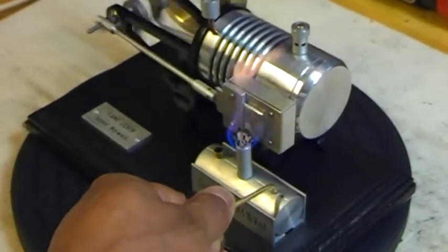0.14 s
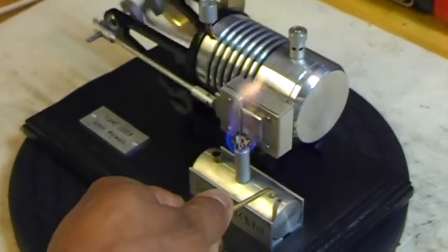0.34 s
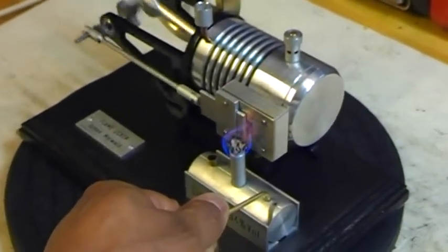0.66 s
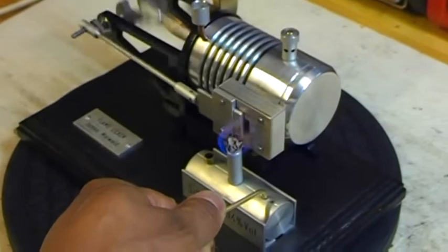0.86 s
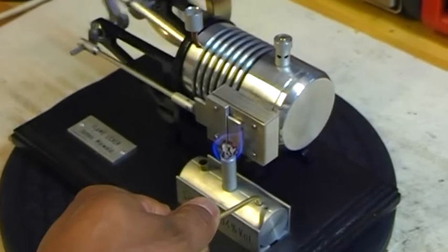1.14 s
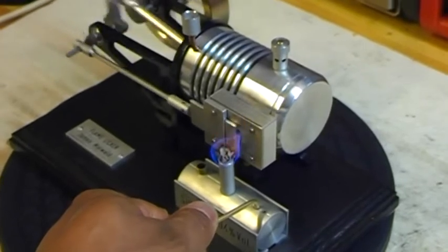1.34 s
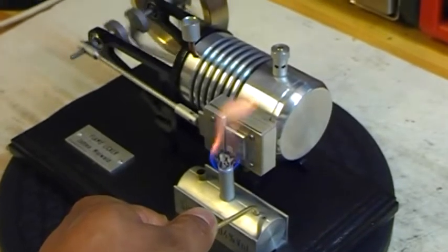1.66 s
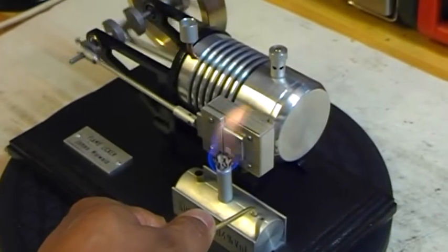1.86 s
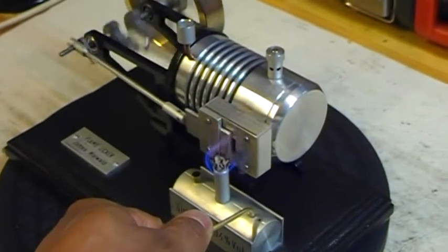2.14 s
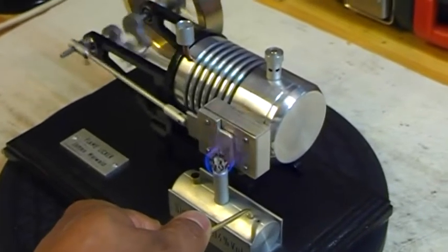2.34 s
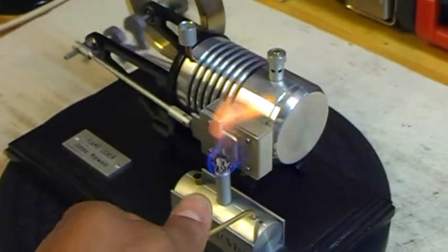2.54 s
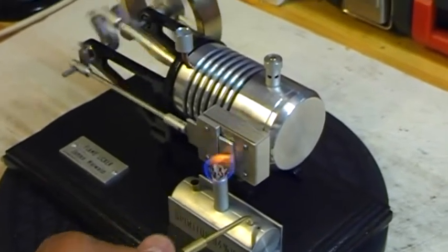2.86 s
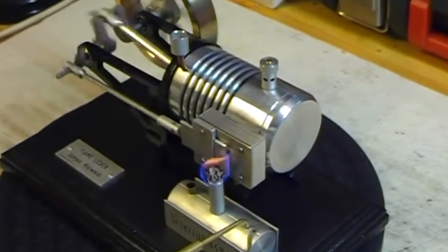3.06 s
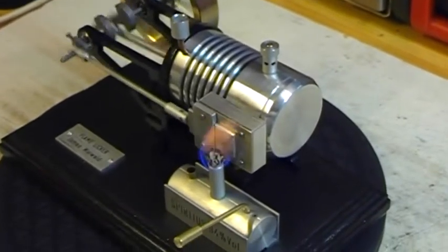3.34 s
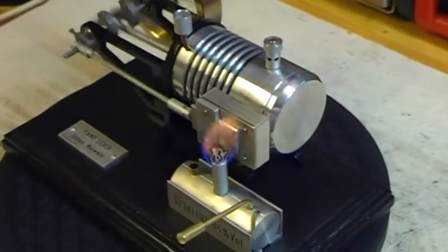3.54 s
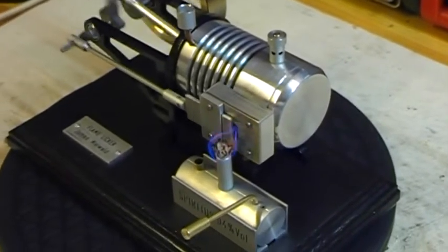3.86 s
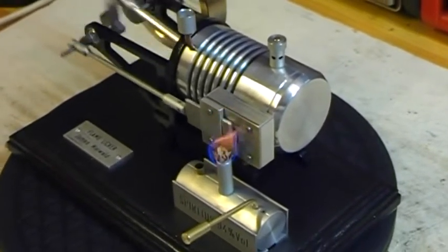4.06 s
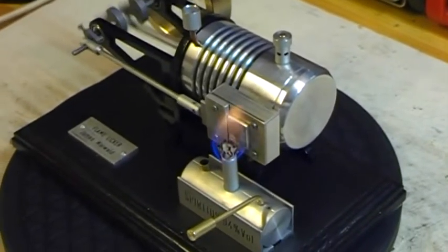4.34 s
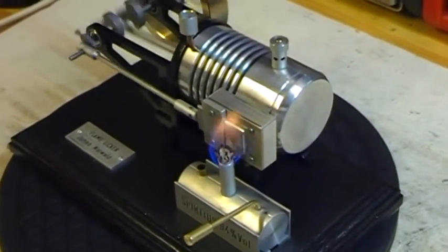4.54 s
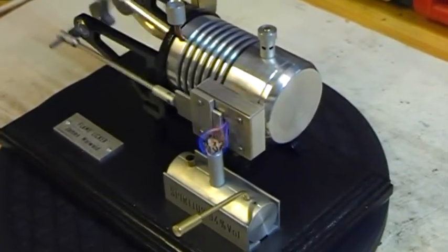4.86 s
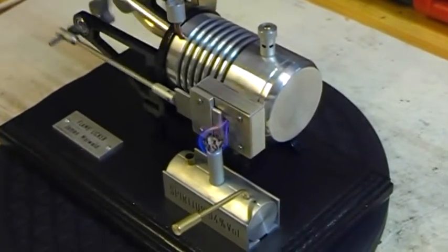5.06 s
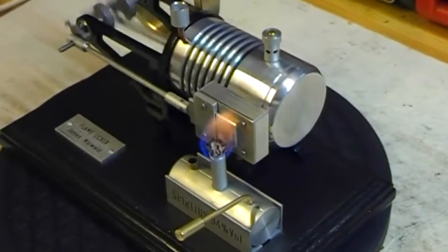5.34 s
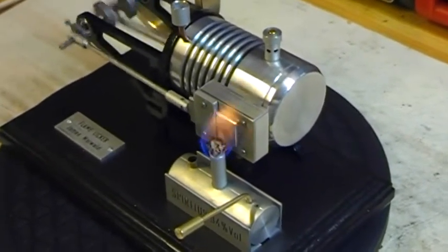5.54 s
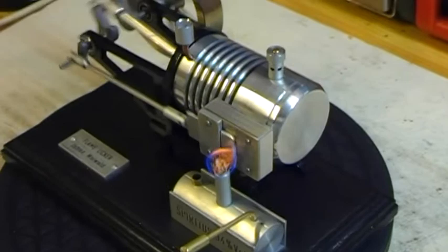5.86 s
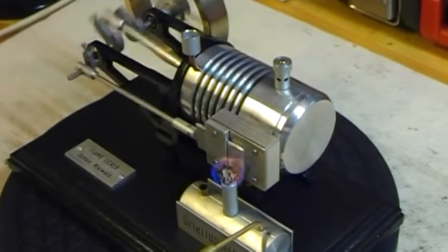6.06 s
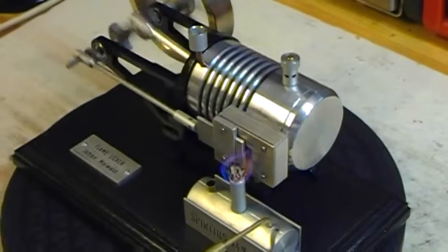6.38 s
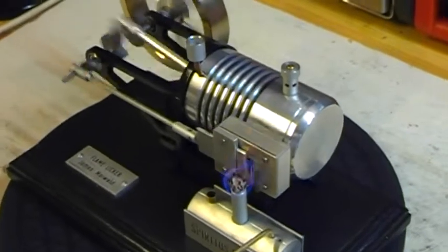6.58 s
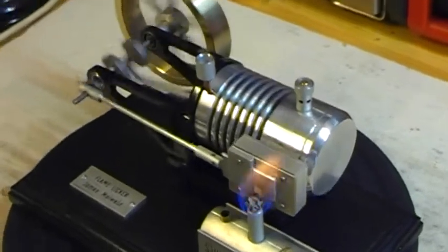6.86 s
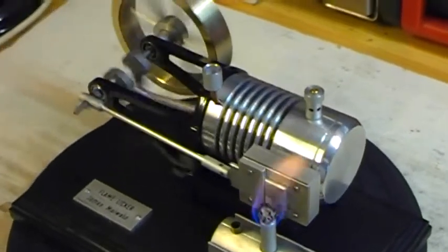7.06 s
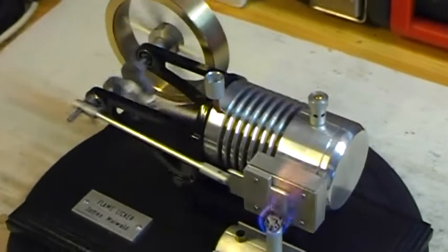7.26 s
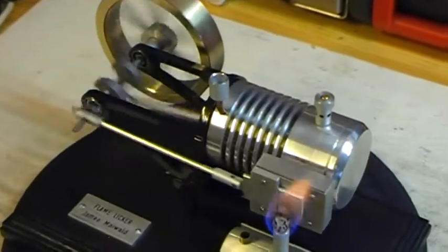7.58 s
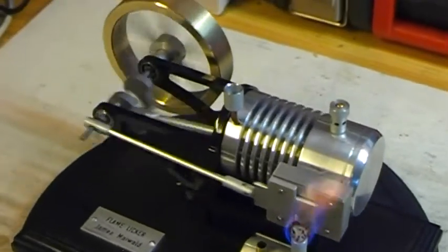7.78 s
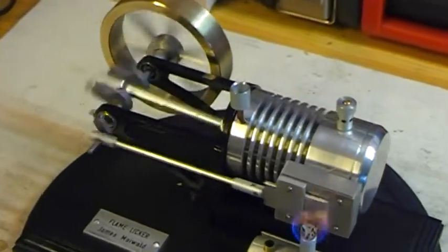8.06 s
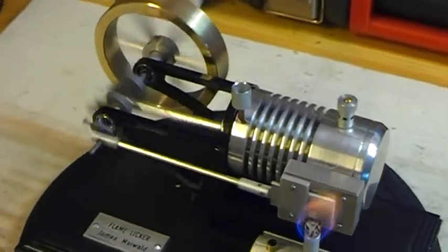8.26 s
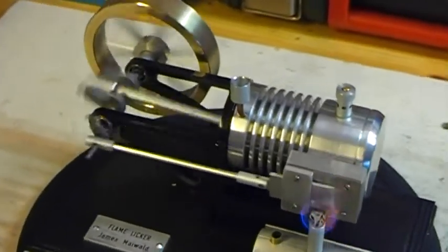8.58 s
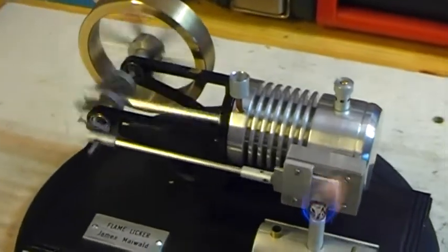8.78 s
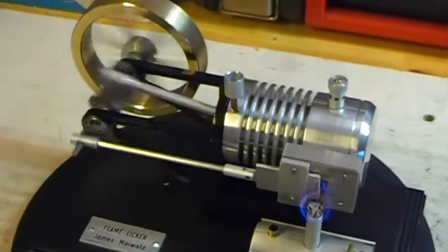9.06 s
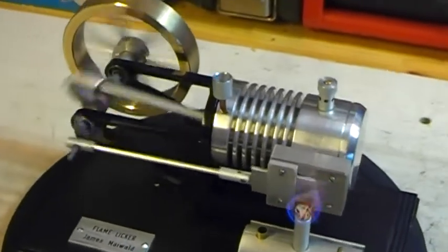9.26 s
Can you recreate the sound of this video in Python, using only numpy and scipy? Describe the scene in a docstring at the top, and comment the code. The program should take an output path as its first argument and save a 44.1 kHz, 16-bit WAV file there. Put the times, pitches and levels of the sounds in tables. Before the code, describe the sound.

A small flame-fed model engine runs close by, popping and clacking sharply about five times a second and slowly speeding up in a quiet room.

```python
"""A small vacuum engine runs on a workbench close by and slowly gains speed.
Once a turn the slide valve slaps and the cylinder pops: struck modes and short puffs of noise.
Cam, rod and bearings knock and tick at their own crank angles; the rod hoots and loose clacks fall off
the beat. Shaped noise makes draught, piston rub, hiss and a thin whistle that follow the crank.
Around it lie a small dry room, its quiet noise floor and a faint steady whine."""
import sys
import numpy as np
from scipy import signal
from scipy.fft import rfft, irfft
from scipy.io import wavfile
from scipy.ndimage import uniform_filter1d

SR = 44100
rng = np.random.default_rng(int(sys.argv[2]) if len(sys.argv) > 2 else 0)


def unload_audio(sound):
    """Save the sound as a 16-bit wav file, at the path given as the first command line argument."""
    columns = np.transpose(np.atleast_2d(sound))
    # keep every value between -1 and 1, then stretch to whole-number steps
    steps = np.round(np.clip(columns, -1, 1) * 32767)
    wavfile.write(sys.argv[1], SR, steps.astype(np.int16))


N = 415422

# One row per engine turn, timed by the pop:
# start_s, pop_db, valve_rebound_db, cam_knock_db, cam_knock_pitch_hz, bearing_tick_db
TURNS = [(-.066, -3.5, -36, -16, 1620, -39), (.1577, -4, -39, -12.5, 1680, -40),
         (0.3816, -3.5, -34, -15.5, 1550, -46), (0.6024, -3, -41, -18.5, 1700, -41),
         (0.8234, -3, -41, -17.5, 1520, -39), (1.043, -3.5, -38, -15.5, 1500, -38.5),
         (1.2598, -4, -36, -15.5, 1640, -41), (1.4747, -3.5, -32, -16.5, 1730, -46),
         (1.6879, -2.5, -27, -16.5, 1570, -38.5), (1.904, -2.5, -37, -17, 1675, -44),
         (2.117, -3.5, -25, -18, 1664, -35), (2.3348, -3, -44, -25, 1700, -38),
         (2.5441, -4, -30, -16, 1636, -39), (2.7558, -3.5, -28, -18.5, 1644, -38),
         (2.9718, -2.5, -24, -13.5, 1633, -43), (3.1851, -4, -39, -20.5, 1585, -40),
         (3.391, -3.5, -29, -22.5, 1500, -42), (3.5928, -3, -29, -20, 1660, -37),
         (3.793, -3, -38, -17, 1560, -40), (3.9927, -4, -36, -18.5, 1680, -38),
         (4.1929, -5, -40, -14, 1540, -36), (4.3934, -4, -42, -16.5, 1520, -32.5),
         (4.5931, -3, -28, -22, 1620, -43), (4.7953, -4, -43, -18, 1610, -38),
         (4.9988, -3, -33, -20, 1647, -39), (5.1968, -3, -29, -26, 1640, -40),
         (5.3937, -3, -38, -15.5, 1554, -41), (5.5873, -3.5, -29, -19, 1420, -37),
         (5.7756, -3, -29, -22, 1486, -42), (5.9639, -3.5, -28, -19, 1470, -39),
         (6.1481, -3.5, -32, -21, 1570, -41), (6.3355, -3.5, -33, -18, 1710, -38),
         (6.5222, -3.5, -25, -17.5, 1580, -42), (6.7087, -3.5, -22, -16, 1730, -41),
         (6.8927, -3.5, -28, -19, 1660, -42), (7.0768, -4.5, -22, -19.5, 1695, -35),
         (7.2581, -4, -25, -19.5, 1790, -38), (7.4345, -4, -22, -19, 1503, -42),
         (7.6099, -4, -17, -20, 1660, -39), (7.7862, -4, -17, -18, 1600, -39),
         (7.96, -5, -24, -21, 1602, -33.5), (8.1327, -3, -21, -19, 1626, -32.5),
         (8.3073, -4, -20, -20, 1680, -37), (8.4817, -4, -24, -16.5, 1634, -32),
         (8.6557, -5, -17.5, -21, 1550, -37), (8.8335, -5, -27, -17.5, 1540, -36),
         (9.0043, -5.5, -16.5, -22, 1640, -39), (9.1743, -5, -26, -33, 1570, -39),
         (9.3464, -5, -21, -25, 1690, -40)]
# Modes of cylinder, frame and base: pitch_hz, head_end_db, flywheel_end_db, t60_s
BODY_MODES = [(215, -53, -82, 0.11), (318.3, -9, -8.5, 0.03), (514, -21, -8.5, 0.024),
              (644, -10, -11, 0.021), (851, -3.5, -17, 0.013), (1420, 2, -32, 0.0064),
              (1760, -37, -16.5, 0.073), (2024, -2, -21, 0.036), (2369, -27, -15, 0.063),
              (3090, -34, -21.5, 0.08)]
# Modes of valve plate and rods: pitch_hz, head_end_db, flywheel_end_db, t60_s
VALVE_MODES = [(3540, -33.5, -6.5, 0.034), (4485, -7.5, -6.5, 0.016), (5220, -8, 3, 0.0091),
               (6320, -7, 0.5, 0.0057), (7670, -10, 1, 0.013), (8820, -6.5, -6.5, 0.012),
               (10240, 5, -7.5, 0.0042), (11500, -1.5, 7.5, 0.003), (13750, -7, -13, 0.0063),
               (14300, -10, -13, 0.0083)]
# Edge of the plate snapping shut: pitch_hz, head_end_db, flywheel_end_db, t60_s
CRACK_MODES = [(6160, -55, -16.5, 0.01), (8860, -8, -4.5, 0.003), (11850, -27, -10.5, 0.01),
               (15300, -28, -14, 0.0055)]
# Play in the linkage: lag_turns from the pop, level_db, pitch_hz;
# level and pitch are each (head end, flywheel end, scatter)
LINKAGE_PLAY = [(-.128, (-83, -30, 2.0), (4500, 6900, 400)), (-.07, (-60, -32, 3.5), (4300, 6200, 500)),
                (.72, (-65.5, -45, 2.3), (8000, 8000, 570))]
# Soft hoots of the rod as the piston turns back: start_s, level_db
ROD_HOOTS = [(4.087, -31), (5.0913, -33.5), (5.6744, -31.5), (6.05, -31), (6.423, -28), (6.609, -31),
             (6.9795, -38), (7.1597, -30), (7.5153, -29), (7.6923, -33.5), (7.8673, -35.5), (8.039, -22),
             (8.2145, -34), (8.5624, -25.5), (8.7394, -30.5), (9.083, -35.5)]
# Loose clacks off the beat: start_s, level_db, pitch_hz
LOOSE_CLACKS = [(6.2836, -23.5, 1490), (6.429, -24, 3140), (6.4567, -15.5, 3130)]
# Steady sounds through one turn: crank_angle_turns after the pop, draught_db, rub_db, hiss_db, whistle_db
CRANK_LEVELS = [(0, -46, -22.5, -45, -48), (0.104, -42.5, -42, -39.5, -56), (.2, -53, -38, -43.5, -45.5),
                (.28, -56, -38.5, -45.5, -44.5), (.4, -55, -52, -52, -57), (.47, -47, -42, -50, -64),
                (0.549, -47.5, -48, -44.5, -56), (.62, -67, -49.5, -56, -54.5), (.78, -61, -55, -58, -58.5),
                (.86, -66, -58.5, -64, -67), (0.891, -76, -45, -43.5, -74), (0.964, -82, -45, -50, -58),
                (0.997, -51, -21.5, -50, -38)]
# Gain of the steady sounds as the engine speeds up: time_s, draught_db, rub_db, hiss_db, whistle_db
EFFORT_GAINS = [(0, 0., -2, -7.5, 3.5), (3., 2, 0, -6.5, 1), (6., 5, 0.5, -6, 2), (8., 5, 2.5, -4.5, 6),
                (9.42, 6, 3, -4, 14)]
# Colour of air drawn through the port: frequency_hz, level_db
DRAUGHT_COLOUR = [(25, -7), (60, 12), (125, -35), (200, -1), (320, -4.5), (500, -18), (800, -9),
                  (1500, -58)]
# Colour of the piston rub: frequency_hz, level_db
RUB_COLOUR = [(200, -49), (400, -10), (650, -2), (850, -4), (1020, -9.5), (1280, -1), (1600, -6),
              (1900, -7.5), (2500, -11), (3200, -15.5), (3900, -33), (6000, -55)]
# Colour of the fine hiss: frequency_hz, level_db
HISS_COLOUR = [(2500, -5.5), (3900, -4), (4700, 5.5), (6000, -3), (6900, -2), (8500, -1), (11500, -6),
               (13500, -16), (16000, -23)]
# Centre of a narrow frame resonance: time_s, pitch_hz
WHISTLE_PITCH = [(0, 1620), (6, 1625), (8.5, 1533)]
# Listening point, from head end (0) to flywheel end (1): time_s, share
LISTENING_POINT = [(0, 0.42), (5.5, 0.4), (7.5, 0.81), (9.42, 0.91)]
# Colour of the quiet room: frequency_hz, level_db (relative density)
FLOOR_COLOUR = [(15, -57), (25, 19), (277, 19), (1020, 13.5), (1400, 10), (3720, -55), (5140, -24),
                (9570, -66), (16000, -39)]
# Gain of the side signal: frequency_hz, gain_db
SIDE_GAIN = [(60, -18), (200, -21), (1000, -18.5), (4000, -15), (8000, -12.5), (15000, -7)]
# Tilt of the mid signal, left over right: frequency_hz, difference_db
LEFT_TILT = [(60, 1.5), (300, 1), (1000, 0.3), (4000, 0), (8000, -0.5), (13000, 0.8)]

# Blends along the engine: (head end, flywheel end, scatter per turn)
CRACK_DB, TOUCH_DB, EDGE_DB = (-4.5, -2, 0.36), (-30, -18, 2.5), (-35, -21.5, 2)
TICK_HZ = (4600, 5840, 250)
KNOCK_LAG_TURNS = .206
BOUNCE_LAG_S, BOUNCE_DB, BOUNCE_SPREAD_DB = .0105, -14, 3.5
TICK_LAG_TURNS, TICK_LAG_S = .435, .0111  # the two lags add up to about half a turn
HOOT_HZ, HOOT_SPREAD_HZ = 1234, 20
FLOOR_DB = -69.5
WHINE_HZ, WHINE_DB = 5970, -68.5
BAND_LIMIT_HZ = 16300


def pops():
    """The valve touches, air rushes in, the cylinder pops, the plate cracks, rattles and bounces back."""
    out = np.zeros(N)
    chance = rng.standard_normal((len(TURNS), 2))
    for (s, pop_db, rebound_db, *_), turn_s, view, (a, b) in zip(TURNS, *crank(), chance):
        crack_db, touch_db = blend(CRACK_DB, view, a), blend(TOUCH_DB, view, b)

        body = ring(heard_from(BODY_MODES, view), 0.0082, 1.0, 0.12) * gain_of(pop_db)
        add(out, s - .0004, np.convolve(body, push(.0003)))
        # the inrush pulls the other way first
        add(out, s - .0018, -.55 * np.convolve(body, push(.0008)))
        # a light touch wakes the upper modes
        add(out, s - .0038, gain_of(-12.5) * np.diff(body, prepend=0))

        plate = ring(heard_from(VALVE_MODES, view), .012, 1.1, 3.1, size=800)
        rattle = np.convolve(plate, burst(9200, 12900, 0.081, size=4000))
        add(out, s, gain_of(crack_db - 17.5) * rattle / abs(rattle).max())
        snap = ring(heard_from(CRACK_MODES, view), 0.052, 2.9, 1.0, size=600)
        soft_snap = np.convolve(snap, [.5, 1, .5])
        add(out, s - .0001, gain_of(crack_db) * soft_snap)

        add(out, s - .0038, gain_of(touch_db) * burst(9200, 10800, 0.028))
        add(out, s - .0022, gain_of(touch_db + 1.8 + 3.9 * view) * burst(6460, 2970, 0.0092))

        # a faster slap throws the plate further, so it lands later
        back_s = s + .033 - .087 * turn_s
        add(out, back_s, gain_of(rebound_db) * burst(4900 + 1200 * view, 1800, 0.0087))
        add(out, back_s - .002, gain_of(pop_db - 19.5) * burst(443, 395, 0.03))
        add(out, back_s, gain_of(pop_db - 22.5) * burst(2150, 680, 0.058))
    bass = signal.sosfiltfilt(signal.butter(4, 165, fs=SR, output="sos"), out)
    return out - .8 * bass  # so small a cylinder radiates little bass


def knocks():
    """Each cam knock rings a close cluster of frame modes, bounces once and gives the rods a bright edge."""
    out, t = np.zeros(N), np.arange(5000) / SR
    chance = rng.standard_normal((len(TURNS), 3))
    # pitch_hz, level_db, t60_s
    rods = [(4770, -3.5, 0.026), (5270, -14.0, 0.024), (7600, -18.5, .09),
            (5900, -37.0, 0.026), (10500, -33.0, .04)]
    for (pop_s, _, _, db, hz, _), turn_s, view, (a, b, c) in zip(TURNS, *crank(), chance):
        s = pop_s + KNOCK_LAG_TURNS * turn_s
        edge_db = blend(EDGE_DB, view, a)

        cluster = [(hz, -4., .05), (1400, -10., .05), (1850, -12., .05), (1605, -14., .09),
                   (800, -19., .06), (420, -20., .05), (2500, -24., .05)]
        chatter = 1 + 0.5 * np.sin(t * 2 * np.pi * rng.uniform(154, 309))
        onset = 1 - np.exp(-t / 0.0004)
        blow = gain_of(db) * ring(cluster, 0.0099, 1.2, 1.0) * chatter * onset
        add(out, s - .0004, blow)
        bounce_s = s + BOUNCE_LAG_S * (1 + 0.1423 * b)
        add(out, bounce_s, gain_of(BOUNCE_DB + BOUNCE_SPREAD_DB * c) * blow)

        add(out, s, gain_of(edge_db - 3.5) * ring(rods, 0.007, 4.2, 2.0))
        add(out, s, gain_of(edge_db) * burst(3900, 7600, 0.03))
    return out


def ticks():
    """Bearing and linkage tick drily at set crank angles: noise with a narrow core and a wide skirt."""
    out = np.zeros(N)
    chance = rng.standard_normal((len(TURNS), len(LINKAGE_PLAY) + 1, 3))
    for (s, *_, bearing_db), turn_s, view, luck in zip(TURNS, *crank(), chance):
        bearing_lag_s = TICK_LAG_S + TICK_LAG_TURNS * turn_s
        rows = [(bearing_lag_s, bearing_db, blend(TICK_HZ, view, luck[-1, 1]))]
        for (lag_turns, db, hz), (a, b, c) in zip(LINKAGE_PLAY, luck):
            lag_s = lag_turns * turn_s + .0005 * c
            rows.append((lag_s, blend(db, view, a), blend(hz, view, b)))
        for lag_s, db, hz in rows:
            add(out, s + lag_s, gain_of(db + 2.5) * burst(hz, 1180, 0.0067))
            add(out, s + lag_s, gain_of(db) * burst(6300, 8200, 0.009))
    return out


def hoots():
    """The rod hoots softly: one tone swells and fades within 14 ms, its pitch a little different each time."""
    out, t = np.zeros(N), np.arange(round(.014 * SR)) / SR
    pitches = HOOT_HZ + HOOT_SPREAD_HZ * rng.standard_normal(len(ROD_HOOTS))
    for (s, db), hz in zip(ROD_HOOTS, pitches):
        tone = np.sin(2 * np.pi * (hz * t + rng.random()))
        add(out, s - .004, gain_of(db) * tone * np.hanning(len(t)) ** 1.8)
    return out


def clacks():
    """Loose clacks: a hard wide click of noise with a dull, rattling tail."""
    out = np.zeros(N)
    for s, db, hz in LOOSE_CLACKS:
        add(out, s, gain_of(db) * burst(hz * 0.95, hz * 0.91, 0.011))
        add(out, s + 0.00073, gain_of(db - 8.5) * burst(hz, hz, 0.16, size=6000))
    return out


def sliding():
    """Air drawn through the port, the piston rubbing, fine hiss and thin whistle, each following the crank."""
    t, at = np.arange(N) / SR, np.transpose(TURNS)[0]
    at = np.r_[at, 2 * at[-1] - at[-2]]
    angle = np.interp(t, at, np.arange(len(at))) % 1
    turns, *layers = np.transpose(CRANK_LEVELS)
    s, *efforts = np.transpose(EFFORT_GAINS)
    draught_db, rub_db, hiss_db, whistle_db = (
        np.interp(angle, turns, db) + np.interp(t, s, effort_db)
        for db, effort_db in zip(layers, efforts))
    draught = coloured_noise(DRAUGHT_COLOUR, draught_db, 2.6)
    rub = coloured_noise(RUB_COLOUR, rub_db, 3.1)
    fine_hiss = coloured_noise(HISS_COLOUR, hiss_db, 3.2)
    return draught + rub + fine_hiss + whistle(whistle_db, 78)


def whistle(level_db, width_hz):
    """Noise through one narrow frame resonance that wavers in pitch."""
    t = np.arange(N) / SR
    waver = 1.8 * uniform_filter1d(rng.standard_normal(N), size=3000)
    hz = np.interp(t, *np.transpose(WHISTLE_PITCH)) * (1 + waver)
    r = np.exp(-np.pi * width_hz / SR)
    noise = rng.standard_normal(N) + 1j * rng.standard_normal(N)
    slow = signal.lfilter([1], np.convolve([1, -r], [1, -r]), noise)
    # shift the slow noise up to the wavering pitch
    tone = (slow * np.exp(2j * np.pi * np.cumsum(hz) / SR)).real
    return tone / tone.std() * gain_of(level_db)


def crank():
    """Length of each turn (s) and the listening point during it (share 0-1)."""
    at = np.transpose(TURNS)[0]
    view = np.interp(at, *np.transpose(LISTENING_POINT))
    return np.diff(at, append=2 * at[-1] - at[-2]), np.clip(view, 0, 1)


def blend(rule, view, chance):
    """A value between head end and flywheel end, plus its scatter from turn to turn."""
    head, wheel, spread = rule
    return head + view * (wheel - head) + spread * chance


def heard_from(modes, view):
    """Modes as heard from one listening point: blends the two level columns."""
    hz, head_db, wheel_db, t60 = np.transpose(modes)
    return np.transpose([hz, head_db + view * (wheel_db - head_db), t60])


def ring(modes, detune, spread_db, phase_spread, size=5000):
    """Modes struck at once; pitch, level and starting phase differ a little at every blow."""
    hz, db, t60 = np.transpose(modes)[:, :, None]
    a, b, c = rng.standard_normal((3, len(modes), 1))
    t = np.arange(size) / SR
    wave = np.sin(2 * np.pi * hz * (1 + detune * a) * t + phase_spread * c)
    decay_db = -60 * t / t60
    return (gain_of(db + spread_db * b + decay_db) * wave).sum(0)


def push(seconds):
    """A smooth force of unit area."""
    shape = np.hanning(round(seconds * SR) + 2)
    return shape / shape.sum()


def burst(hz, width_hz, t60, size=1500):
    """A short puff of decaying noise around one pitch, scaled to peak at 1."""
    noise = rng.standard_normal(size) * gain_of(-60 * np.arange(size) / SR / t60)
    band = np.clip([hz - width_hz / 2, hz + width_hz / 2], 50, 17000)
    out = signal.sosfilt(signal.butter(2, band, "band", fs=SR, output="sos"), noise)
    return out / abs(out).max()


def coloured_noise(spectrum, level_db, patchy_db):
    """Noise of the given colour with drifting patches in time and frequency, on a level curve."""
    frames, hz = N // 128 + 5, np.fft.rfftfreq(512, 1 / SR)
    a, b, patches = rng.standard_normal((3, 257, frames))
    patches = uniform_filter1d(patches, size=5, axis=0)
    patches = uniform_filter1d(patches, size=5, axis=1) * 5  # back to unit spread
    z = (a + 1j * b) * gain_of(read(spectrum, hz)[:, None] + patchy_db * patches)
    noise = signal.istft(z, nperseg=512, noverlap=384)[1][:N]
    return noise / noise.std() * gain_of(level_db)


def gain_of(db):
    """Decibels to gain."""
    return 10 ** (np.asarray(db) / 20)


def read(points, hz):
    """Reads a spectrum on a log-frequency axis."""
    f, value = np.transpose(points)
    return np.interp(np.log(hz + 1), np.log(f + 1), value)


def add(mix, s, sound):
    """Mixes a sound in at time s, trimmed at both ends of the scene."""
    at = round(s * SR)
    sound = sound[max(-at, 0):]
    part = mix[max(at, 0):][:len(sound)]
    part += sound[:len(part)]


def room(x, t60, gap, size=12000):
    """Sparse reflections of random sign that die away; the taps have unit energy."""
    taps = np.zeros(size)
    at = np.arange(gap, size - 20, 20).astype(int)
    taps[at + rng.integers(0, 20, len(at))] = rng.choice([-1., 1.], len(at))
    taps *= gain_of(-60 * np.arange(size) / SR / t60)
    return signal.fftconvolve(x, taps / np.linalg.norm(taps))[:N]


def shifting_reflections(x, t60, gap):
    """Three sets of reflections take turns at constant total power, so that like hits differ."""
    phase = np.arange(N) / SR * 1.262
    shares = [np.cos(np.pi * (phase + k / 3)) * np.sqrt(2 / 3) for k in range(3)]
    return sum(room(x * share, t60, gap, size=4000) for share in shares)


def whine():
    """A faint steady whine: one sine."""
    return gain_of(WHINE_DB) * np.sin(2 * np.pi * WHINE_HZ * np.arange(N) / SR)


def scene():
    """The engine near the middle; the spacing of the capsules, bench and walls add the width."""
    hits = pops() + knocks() + hoots() + ticks() + clacks()
    engine = hits + sliding()
    mid = engine + gain_of(-19.5) * room(hits, 0.19, 150)
    mid += whine() + coloured_noise(FLOOR_COLOUR, FLOOR_DB, 1.3)

    scattered = gain_of(-3.5) * shifting_reflections(engine, 0.062, 10)
    scattered += gain_of(-14.5) * room(engine, 0.66, 150)
    scattered += coloured_noise(FLOOR_COLOUR, FLOOR_DB + 29.5, 1.5)  # raised, as SIDE_GAIN lowers it

    hz = np.fft.rfftfreq(N, 1 / SR)
    quarter_turned = 1j * gain_of(-1.5) * rfft(engine)  # engine 90 degrees out of phase
    side = (rfft(scattered) + quarter_turned) * gain_of(read(SIDE_GAIN, hz))
    lean = gain_of(read(LEFT_TILT, hz) / 2)
    left = irfft(rfft(mid) * lean + side, N)
    right = irfft(rfft(mid) / lean - side, N)
    return np.array([left, right])


def record(dry):
    """Small capsules lose the deep bass; peaks beyond full scale clip; then the band limit."""
    thin = signal.sosfilt(signal.butter(1, 40, "high", fs=SR, output="sos"), dry)
    lowpass = signal.firwin(511, BAND_LIMIT_HZ, window=("kaiser", 9), fs=SR)
    return signal.oaconvolve(np.clip(thin, -1, 1), lowpass[None], "same")


dry = scene()
out = record(dry)
unload_audio(out)
```